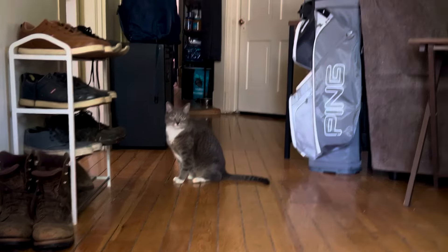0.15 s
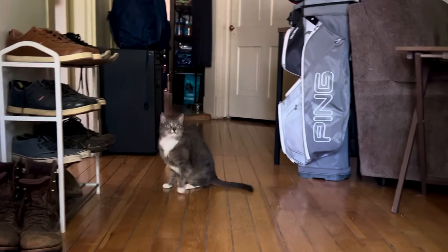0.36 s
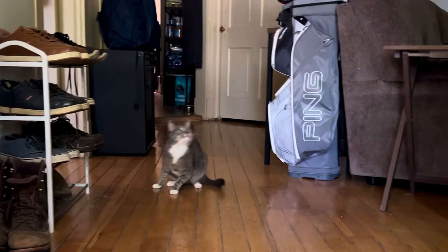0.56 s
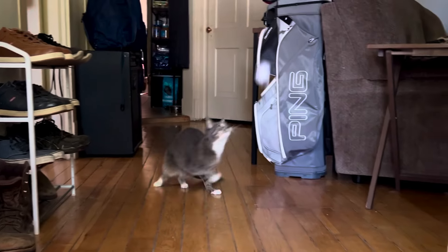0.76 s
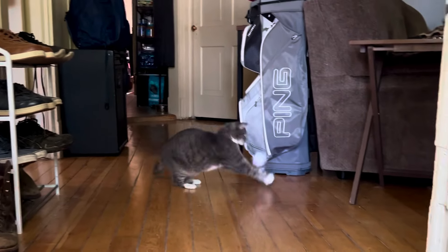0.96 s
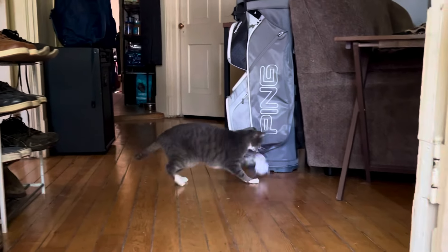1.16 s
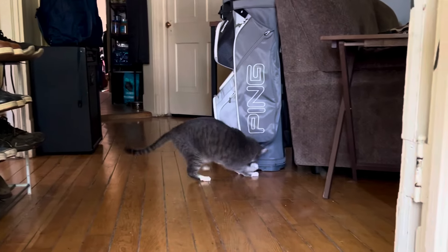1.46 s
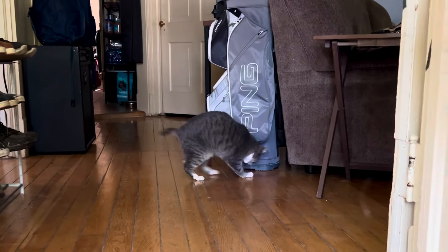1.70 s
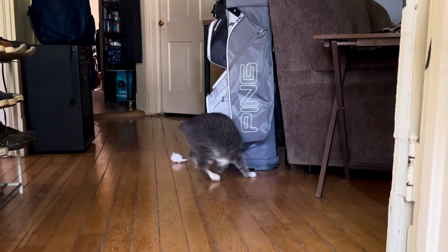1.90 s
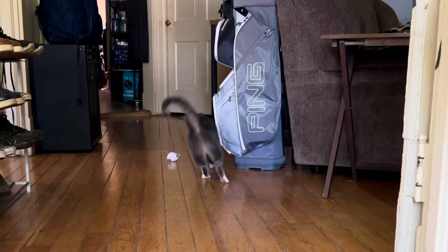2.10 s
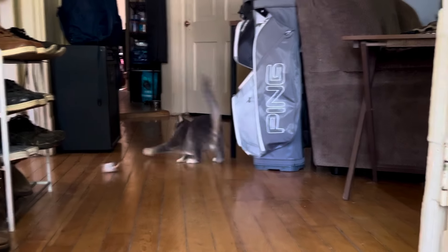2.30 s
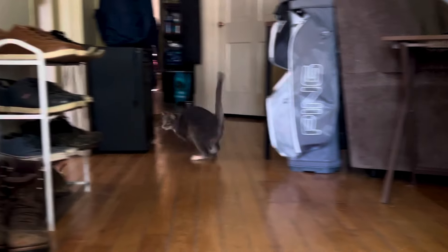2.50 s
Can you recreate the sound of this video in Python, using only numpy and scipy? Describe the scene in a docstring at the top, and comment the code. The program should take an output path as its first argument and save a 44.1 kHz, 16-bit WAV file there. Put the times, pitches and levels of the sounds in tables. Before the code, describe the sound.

Quick cat footfalls and claw skids on wooden boards, with a toy rattling, over low hum

```python
"""A cat chases a small rattling toy over a hardwood floor, a few metres away in a hallway.
Beads shower against the toy's shell, paws thump and knock on the boards, claws skid, something hollow is
scraped and a board snaps, after a few light ticks close by. Noise bursts model the many small contacts,
damped swings and resonances model the wood, and a decaying noise tail models the room.
A steady low appliance hum and faint room air lie underneath."""
import sys
import numpy as np
from scipy import signal
from scipy.fft import rfft, irfft
from scipy.io import wavfile
from scipy.ndimage import uniform_filter1d

SR = 44100
rng = np.random.default_rng(int(sys.argv[2]) if len(sys.argv) > 2 else 0)


def dump(signal):
    """Clip the signal to [-1, 1] and save it as 16-bit WAV at the path in sys.argv[1]."""
    limited = np.clip(np.atleast_2d(signal).T, -1, 1)
    pcm = np.round(limited * 32767).astype(np.int16)
    wavfile.write(sys.argv[1], SR, pcm)


N = 116865  # samples

GRAIN = 0.5  # spread of contact sizes, as a natural logarithm
CRACKLE = 0.85  # share of the power in separate clicks


def undb(db):
    """Decibels are twenty times the decimal logarithm of an amplitude ratio."""
    return 10 ** (np.asarray(db) / 20)


def unit(x):
    """Division by the root mean square gives unit power."""
    return x / np.sqrt(np.mean(x ** 2))


def colour(x, points):
    """Minimum-phase filter through (frequency_hz, gain_db) points, from a folded real cepstrum."""
    hz, db = np.array(points, float).T
    size = 16384
    f = np.maximum(np.fft.rfftfreq(size, 1 / SR), 1)
    gain = undb(np.interp(np.log(f), np.log(hz), db))
    cepstrum = irfft(np.log(gain))
    # folding the negative times onto the positive ones makes the filter causal
    cepstrum[1:size // 2] *= 2
    cepstrum[size // 2 + 1:] = 0
    response = irfft(np.exp(rfft(cepstrum)))[:size // 2]
    return signal.fftconvolve(x, response)[:len(x)]


def shaped(x, points):
    """Spectral shaping divided by the filter's energy, so that white noise keeps its expected power."""
    response = colour(signal.unit_impulse(SR // 10), points)
    return colour(x, points) / np.linalg.norm(response)


def ring(x, hz, width_hz, order=1):
    """Band-pass resonance that keeps the power of its input; higher orders are steeper."""
    # the centre is the geometric mean of the band edges
    low = np.hypot(hz, width_hz / 2) - width_hz / 2
    high = min(low + width_hz, SR / 2 - 1)
    band = signal.butter(order, [low, high], "band", fs=SR, output="sos")
    y = signal.sosfilt(band, x + 1e-18)
    return y * np.linalg.norm(x) / np.linalg.norm(y)


def burst(start, rise_s, decay_s, grain, crackle=0):
    """Random contact noise: tiny impacts of uneven size under a linear rise and exponential decay."""
    t = np.arange(N) / SR - start
    rise = np.clip(t / max(rise_s, 1e-4), 0, 1)
    env = rise * np.exp(-np.maximum(t - rise_s, 0) / decay_s)
    hold = SR // 1000  # each contact size lasts about 1 ms
    log_sizes = grain * np.clip(rng.standard_normal(N // hold + 1), -2, 2)
    sizes = np.repeat(np.exp(log_sizes), hold)[:N]
    contacts_per_s = 1300
    hits = rng.random(N) < contacts_per_s / SR
    clicks = unit(rng.standard_normal(N) * hits)
    hiss = rng.standard_normal(N)
    contacts = np.sqrt(crackle) * clicks + np.sqrt(1 - crackle) * hiss
    return unit(env * sizes * contacts) * np.sqrt(np.mean(env ** 2))


def swing(start, hz, rise_cycles, decay_cycles):
    """Heavily damped oscillation of wood, pushed once."""
    cycles = np.maximum(np.arange(N) / SR - start, 0) * hz
    rise = np.minimum(cycles / rise_cycles, 1)
    env = rise * np.exp(-np.maximum(cycles - rise_cycles, 0) / decay_cycles)
    return np.sqrt(2) * np.sin(2 * np.pi * cycles) * env


def walk(rate):
    """Smoothed random steps, rate per second, give a slow wander with a root mean square of 1."""
    k = int(SR / rate)
    steps = np.repeat(rng.standard_normal(N // k + 1), k)
    return unit(uniform_filter1d(uniform_filter1d(steps, k), k)[:N])


def room(x, wet_db):
    """Reverberation: direct sound plus a diffuse tail, its middle range wide, spread over two channels."""
    # left-right difference against the sum: frequency_hz, difference_db
    spread_points = [(300, -28), (1200, -5), (6000, -18), (8500, 11.5), (11500, -2.5)]
    bass_t60_s, middle_t60_s, treble_t60_s = 0.9, 0.41, 0.27
    gap_s = 0.0015  # the tail fades in from 0.5 to 1.5 gaps
    wide_hz, side_db = 1050, 3  # the tail narrows below wide_hz; side gain before the band weights

    t = np.arange(SR * 2 // 3) / SR
    f = np.fft.rfftfreq(len(t), 1 / SR)
    bass = 1 / (1 + (f / 300) ** 4)
    treble = 1 - 1 / (1 + (f / 8000) ** 4)
    noise = rfft(rng.standard_normal((2, len(t))))
    noise[1] *= undb(side_db) * (1 - treble) * f / np.hypot(f, wide_hz)
    bands = [(bass, bass_t60_s), (1 - bass - treble, middle_t60_s), (treble, treble_t60_s)]
    # each band falls by 60 dB in its own time
    tail = sum(irfft(noise * w, len(t)) * np.exp(-np.log(1000) * t / t60) for w, t60 in bands)
    tail = tail * np.clip(t / gap_s - 0.5, 0, 1)
    tail = tail / np.linalg.norm(tail[0])
    mid, side = signal.fftconvolve(x[None], tail, axes=1)[:, :N] * undb(wet_db)
    mid = mid + x

    # a quarter-cycle-shifted copy of the sum, weighted by frequency, widens the stereo image
    hz, db = np.array(spread_points).T
    spread = undb(np.interp(np.fft.rfftfreq(2 * N, 1 / SR), hz, db))
    side = side + irfft(-1j * spread * rfft(mid, 2 * N))[:N]
    return np.array([mid + side, mid - side])


def toy():
    """Repeated impact: beads hit the shell of the toy in short, crackling showers."""
    # shakes of the toy: start_s, beads_level_db, decay_s, shell_against_beads_db
    rattles = [(0.906, -49, 0.062, -11.5), (0.937, -52, .012, -35), (1.056, -54, 0.0049, -36),
               (1.204, -43.5, 0.011, -19), (1.215, -49, 0.018, -6), (1.283, -38.5, 0.0038, -11.5),
               (1.295, -44, 0.0041, -12.5), (1.43, -41.5, 0.007, -25), (1.446, -55.5, 0.046, -17.5),
               (1.527, -58, 0.03, -9.5), (1.725, -68.5, 0.087, -2), (1.872, -63.5, 0.046, -39),
               (2.149, -32.5, 0.0052, -16)]
    # relative spectrum of the beads: frequency_hz, density_db (per Hz)
    bead_spectrum = [(2000, -23), (7500, -13), (9000, -6.5), (10000, -16), (11500, -3.5), (12800, 1.5),
                     (13700, -32), (15500, -17), (16500, -46)]
    # relative spectrum of the shell: frequency_hz, density_db (per Hz)
    shell_spectrum = [(300, 13.5), (900, 3.5), (2000, 3.5), (3300, 7), (5000, 6.5), (7000, -4.5),
                      (9000, 8.5), (14000, -77)]
    beads, shell = 0, 0
    for start, db, decay, shell_db in rattles:
        bead_hits = burst(start, 0.002, decay, grain=GRAIN, crackle=CRACKLE)
        shell_hits = burst(start, 0.006, decay, grain=GRAIN, crackle=CRACKLE)
        beads = beads + undb(db) * bead_hits
        shell = shell + undb(db + shell_db) * shell_hits
    return room(shaped(beads, bead_spectrum), wet_db=-1.0) + room(shaped(shell, shell_spectrum), wet_db=5.0)


def thumps():
    """Damped bending: soft pads push the boards, which swing for a few cycles."""
    # weight of the cat on the boards: start_s, swing_level_db, pitch_hz
    footfalls = [(0.887, -44.5, 175), (0.902, -39.5, 122), (.914, -39.5, 206), (0.931, -38, 121),
                 (0.985, -58, 122), (1.225, -50.5, 138), (1.563, -47, 146), (1.632, -42, 167),
                 (1.787, -39.5, 225), (1.927, -48.5, 200), (2.172, -40.5, 176), (2.285, -38, 169),
                 (2.318, -33.5, 144), (2.349, -38.5, 156), (2.361, -31.5, 87), (2.42, -39.5, 206),
                 (2.513, -45.5, 200), (2.539, -29.5, 88.2), (2.547, -45, 242)]
    roughness = 0.28  # amplitude of the noise against the swing
    out = 0
    for start, db, hz in footfalls:
        push = swing(start, hz, rise_cycles=0.855, decay_cycles=0.96)
        rough = ring(burst(start, 0.011, 2 / hz, grain=0), hz, hz, order=2)
        out = out + undb(db) * (push + roughness * rough)
    return room(out, wet_db=-6.5)


def knocks(scuff_db=-14):
    """Short contact: harder hits give a brief wooden knock, with a faint scuff as the foot settles."""
    # paws and claws on wood: start_s, knock_level_db, pitch_hz
    hits = [(0.067, -51, 454), (0.904, -52.5, 940), (1.002, -52.5, 634), (1.053, -39, 500),
            (1.057, -42.5, 864), (1.067, -61, 603), (1.296, -50, 600), (1.624, -56, 720),
            (1.630, -36.5, 438), (1.643, -47.5, 474), (1.719, -37, 1570), (1.727, -38.5, 616),
            (1.782, -42, 406), (2.280, -38, 747), (2.291, -44, 1480), (2.321, -40.5, 1630),
            (2.512, -39, 950), (2.521, -37.5, 1690), (2.537, -38, 585), (2.548, -37.5, 1390),
            (2.571, -47.5, 467), (2.59, -47.5, 633)]
    out = 0
    for start, db, hz in hits:
        knock = swing(start, hz, rise_cycles=0.9, decay_cycles=0.75)
        scuff = ring(burst(start, 0.0031, 0.017, grain=GRAIN), hz, hz, order=2)
        out = out + undb(db) * (knock + undb(scuff_db) * scuff)
    return room(out, wet_db=-3)


def skids(width=1.72):
    """Stick-slip friction: claws and pads catch and slip on the varnish; width is a share of the centre."""
    # feet skidding: start_s, level_db (before the final filter), rise_s, decay_s, centre_hz
    slides = [(0.065, -48, 0.0078, 0.03, 6400), (1.053, -44.5, 0.0032, 0.015, 2600),
              (1.62, -54.5, 0.0038, 0.09, 2260), (1.709, -42.5, 0.015, 0.0042, 2070),
              (1.77, -57, 0.012, 0.43, 1480), (1.909, -43.5, 0.023, 0.054, 2860),
              (2.016, -35.5, 0.027, 0.036, 3700), (2.279, -46.5, 0.048, 0.061, 3240),
              (2.429, -47.5, 0.099, 0.17, 2290), (2.511, -46, 0.0035, 0.042, 2000),
              (2.561, -39, 0.015, 0.038, 3200)]
    out = 0
    for start, db, rise, decay, hz in slides:
        friction = burst(start, rise, decay, grain=GRAIN, crackle=CRACKLE / 2)
        out = out + undb(db) * ring(friction, hz, hz * width, order=2)
    out = colour(out, [(1000, -5.5), (7000, -12.0), (10000, -21), (12500, 1), (14000, -19)])
    return room(out, wet_db=-3)


def scrapes():
    """Forced resonance: gritty rubbing makes a hollow body ring."""
    # strokes: start_s, rub_level_db (before the resonances), rise_s, decay_s
    strokes = [(1.97, -46.5, 0.008, 0.023), (2.014, -32.5, 0.004, 0.0086), (2.03, -33, 0.0035, 0.021)]
    # resonances of the hollow body: centre_hz, width_hz, relative_level_db
    hollow = [(377, 190, -12), (714, 45, -3.5), (777, 70, 0), (930, 140, 1.5), (1094, 132, 7),
              (1268, 50, 1), (2100, 330, -6)]
    rub = 0
    for start, db, rise, decay in strokes:
        rub = rub + undb(db) * burst(start, rise, decay, grain=GRAIN, crackle=CRACKLE)
    body = sum(undb(db - 11.5) * ring(rub, hz, width, order=2) for hz, width, db in hollow)
    return room(body, wet_db=-6.5)


def snap():
    """Sudden release: a floorboard close by gives one dry snap, a damped swing with a sharp crack."""
    start_s, pitch_hz = 2.3505, 1040
    board = swing(start_s, pitch_hz, rise_cycles=0.95, decay_cycles=0.28)
    crack = ring(burst(start_s, 0.0004, 0.0012, grain=0), 5800, 4100, order=2)
    return room(undb(-31.5) * board + undb(-41) * crack, wet_db=-11)


def ticks():
    """Brief impact: light ticks close by, a bright tip over a little broadband body."""
    # ticks: start_s, tip_level_db, body_against_tip_db
    taps = [(0.0268, -48, -7.5), (0.079, -53, -17), (0.118, -51.5, 0), (0.145, -50.5, -6.5),
            (0.217, -57, -27), (0.2901, -55, -8), (.556, -67, -16), (0.679, -70, -4), (.857, -60.5, -11)]
    # relative spectrum of the tip: frequency_hz, density_db (per Hz)
    tip_spectrum = [(2000, -34), (6500, -8), (9000, 3.5), (12300, -2), (14000, -9), (17000, -22)]
    tips, body = 0, 0
    for start, db, body_db in taps:
        tips = tips + undb(db) * burst(start, 0.0014, 0.0025, grain=GRAIN)
        body = body + undb(db + body_db) * burst(start, 0.0028, 0.0027, grain=GRAIN)
    return room(shaped(tips, tip_spectrum) + ring(body, 5000, 10000, order=1), wet_db=-3.5)


def background():
    """Narrow-band modulation: two wavering low tones of an appliance over faint, shaped room-air noise."""
    # tones of the appliance: frequency_hz, level_db (of the steady part, right channel)
    tones = [(38.6, -51.5), (72.6, -43.5)]
    # relative spectrum of the room air: frequency_hz, density_db (per Hz)
    air_spectrum = [(20, -30), (48, 5), (80, 1.5), (120, -1), (200, -18.5), (400, -24.5), (1000, -34.5),
                    (2100, -38), (3000, -44.5), (9000, -45.5), (12500, -38.5), (14000, -62.5)]
    waver, waver_per_s = 0.15, 22  # relative depth and random steps per second
    air_db, side_db = -56.5, -7  # mid level, and side against mid before its filter
    t = np.arange(N) / SR
    hum = 0
    for hz, db in tones:
        wander = 1 + waver * (walk(waver_per_s) + 1j * walk(waver_per_s))
        carrier = np.exp(2j * np.pi * (hz * t + rng.random()))
        hum = hum + undb(db) * np.sqrt(2) * np.real(wander * carrier)
    mid, side = (undb(air_db) * shaped(rng.standard_normal(N), air_spectrum) for _ in range(2))
    side = undb(side_db) * colour(side, [(70, -3), (200, -2.5), (1500, 7.0)])
    # the hum is very slightly stronger on the left
    return np.array([hum * undb(0.03) + mid + side, hum + mid - side])


def scene():
    """Superposition: the pressures of all the sources add."""
    return toy() + thumps() + knocks() + skids() + scrapes() + snap() + ticks() + background()


def record(dry):
    """Low-pass filtering: the recorder cuts the top above 16.3 kHz."""
    low_pass = signal.ellip(8, 0.2, 70, 16300, fs=SR, output="sos")  # ripple and stopband in dB
    return signal.sosfilt(low_pass, dry)


dry = scene()
out = record(dry)
dump(out)
```